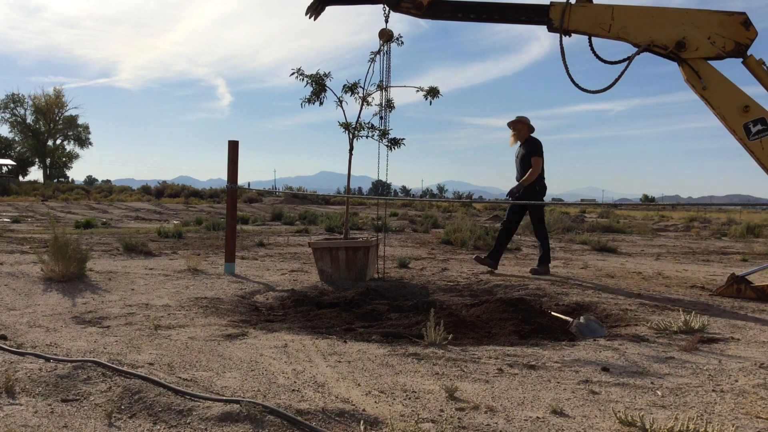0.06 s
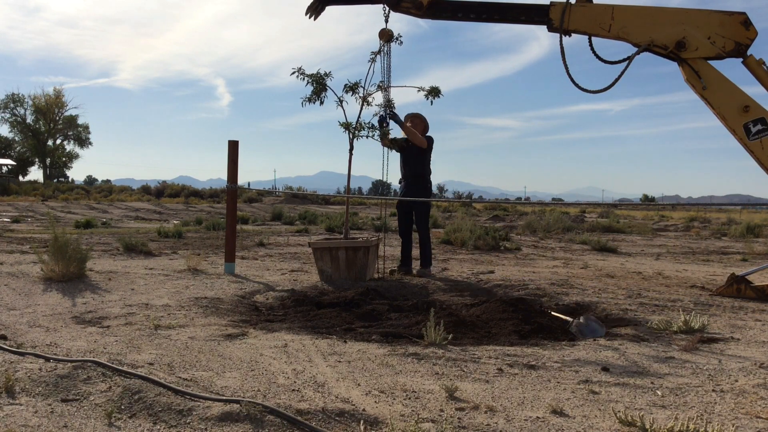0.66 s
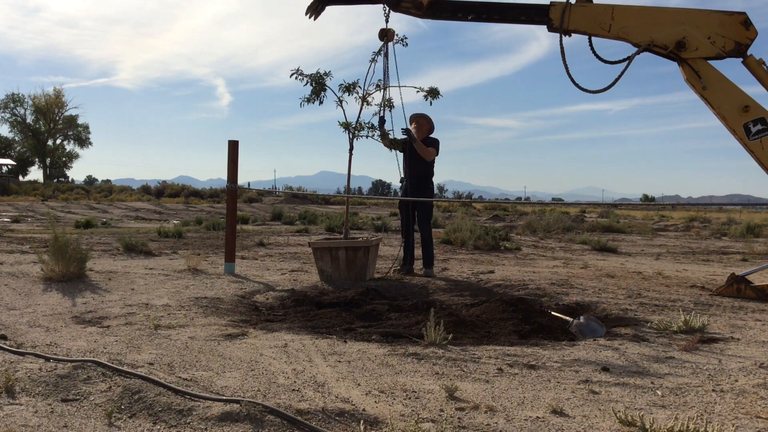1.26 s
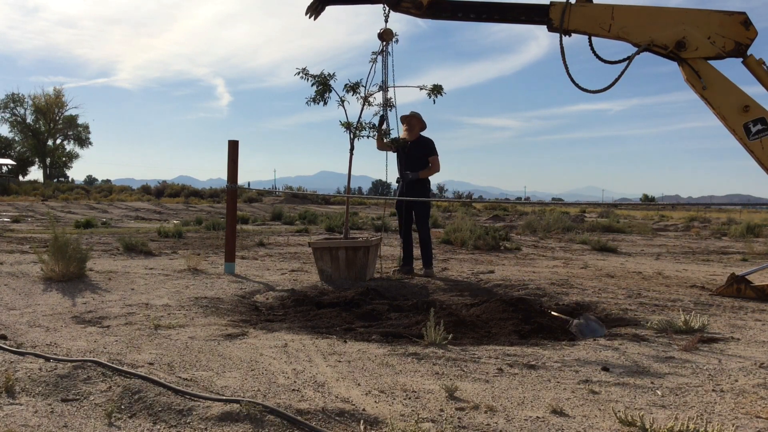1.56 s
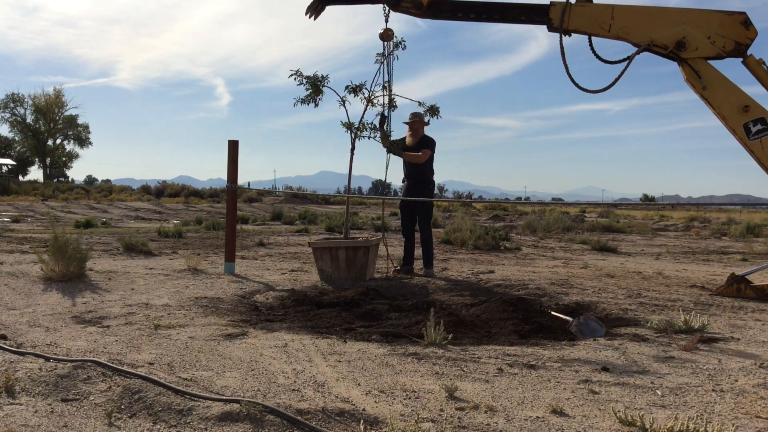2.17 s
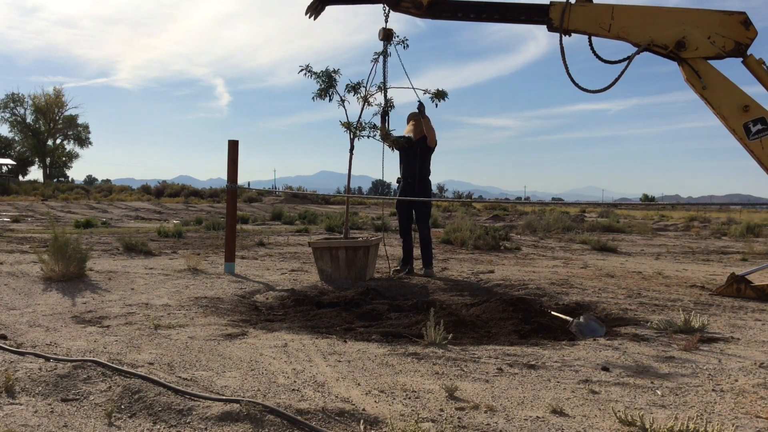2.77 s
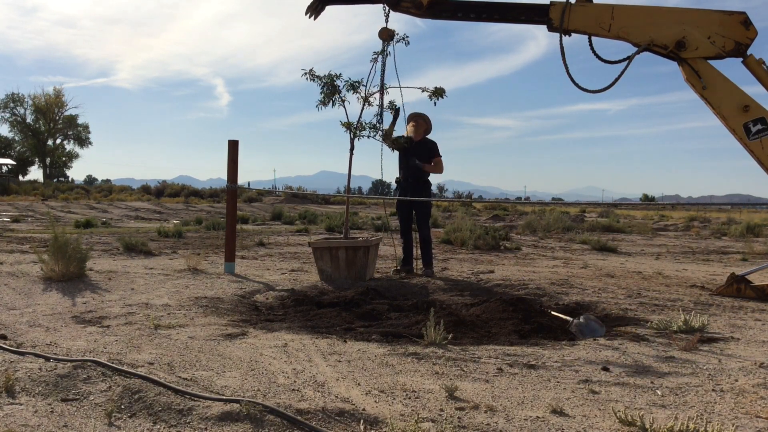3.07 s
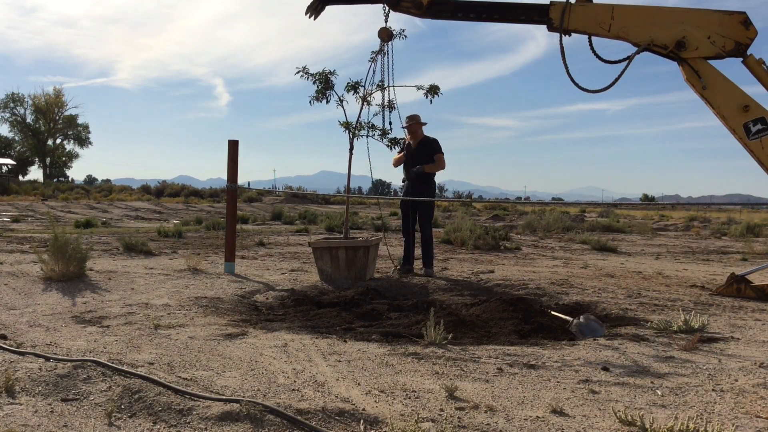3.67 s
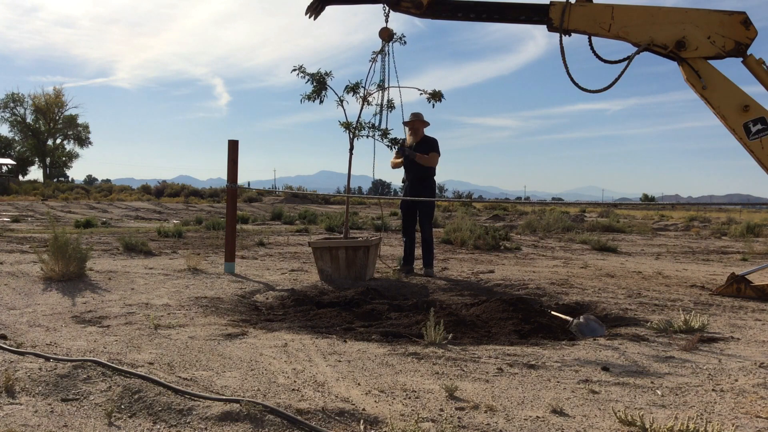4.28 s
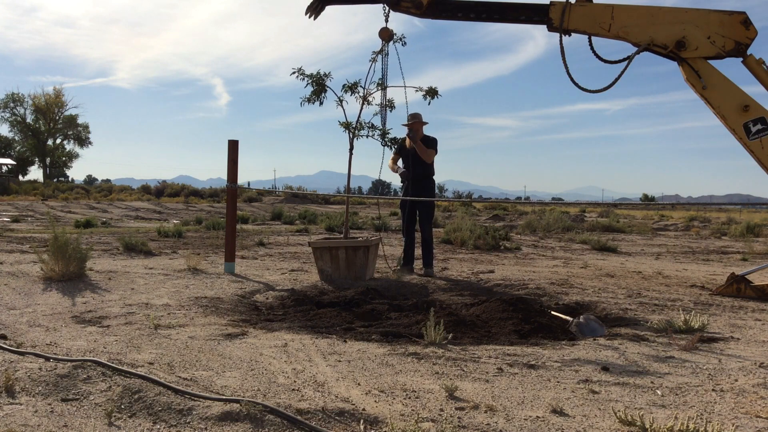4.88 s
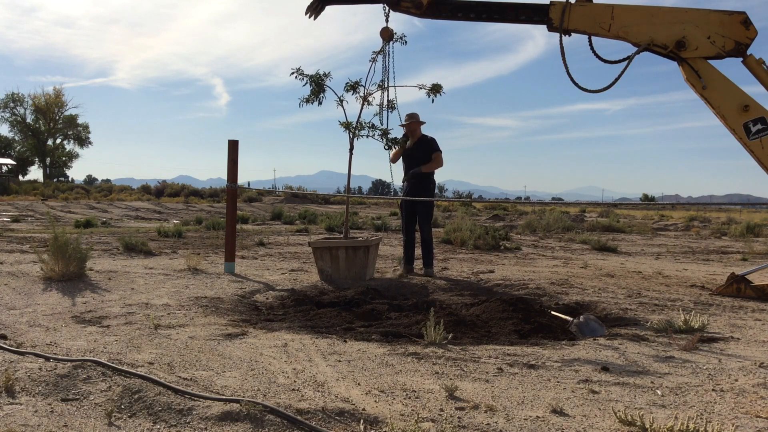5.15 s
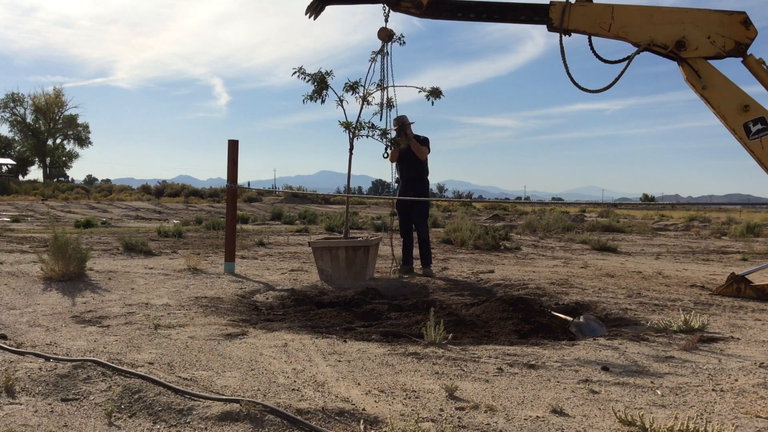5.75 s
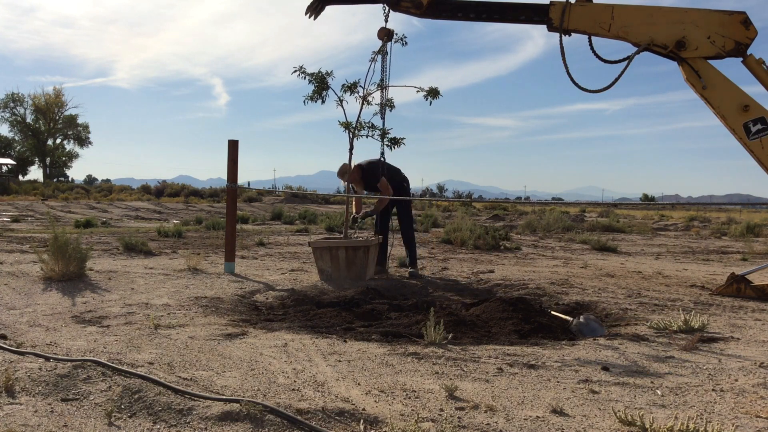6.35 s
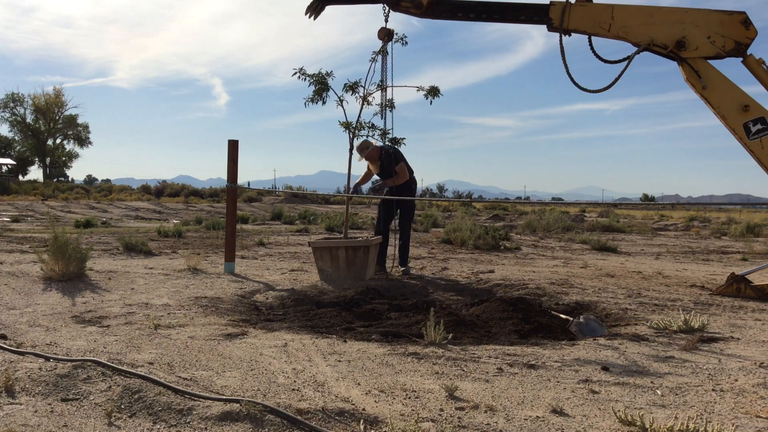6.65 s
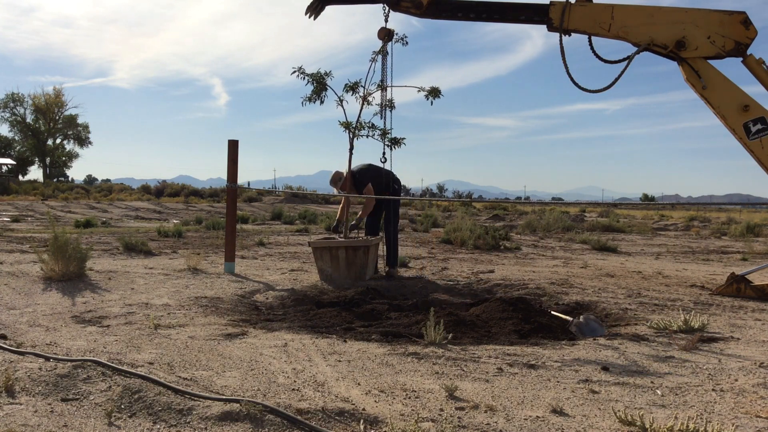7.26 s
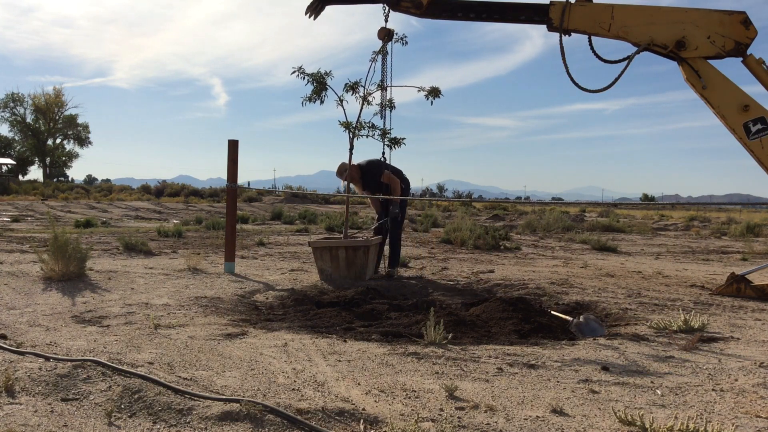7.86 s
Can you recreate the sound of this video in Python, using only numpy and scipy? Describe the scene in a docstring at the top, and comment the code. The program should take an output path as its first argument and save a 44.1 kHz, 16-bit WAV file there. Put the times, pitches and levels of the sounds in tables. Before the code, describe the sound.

Light wind blows over open desert, with two very soft footsteps on gritty soil in the first half second. From about 0.6 seconds, loose steel chain links tick and jingle some metres away. Between 1.2 and 2.5 seconds the chain is tugged through a hoist four times in short rattling bursts, the last two weaker. After a few more clinks, a long run starts at about 2.9 seconds: links and catch clack rapidly, making the steel housing ring, with faint dull knocks from the hook. The rattle grows faster and louder, stalls briefly near 5.8 seconds, surges again and runs out by 6.3 seconds with a tiny squeak and a few last ticks. A far vehicle's low road noise swells from around 5 seconds, with a faint wavering whine near the end, at about 8 seconds. A soft wind puff bumps the microphone at 7 seconds.

```python
"""A chain hoist rattles some metres away, hanging from an excavator boom in open desert.
Its hand chain is gathered up, tugged four times, then hauled in one fast run. The links and
the pawl (a small catch) clack against the wheel and make the steel housing ring.
Behind it are two soft footsteps, light wind and a far vehicle that slowly draws nearer."""
import sys
import numpy as np
from scipy import signal
from scipy.fft import rfft, irfft
from scipy.io import wavfile
from scipy.ndimage import uniform_filter1d, map_coordinates

SR = 44100
rng = np.random.default_rng(int(sys.argv[2]) if len(sys.argv) > 2 else 0)


def master(y):
    """Save y as 16-bit WAV."""
    cut = np.clip(np.atleast_2d(y).T, -1, 1)
    pcm = np.round(cut * 32767)  # scale
    wavfile.write(sys.argv[1], SR, pcm.astype(np.int16))


N = 349272
TIME = np.arange(N) / SR

# How each steel part rings when struck: f/Hz, width/Hz, level/dB
LINK_TONES = [(3210, 244, -0.5), (3564, 510, -10), (4310, 1400, -5), (4786, 140, -1), (5400, 730, -2),
              (6240, 440, -6), (6680, 1700, -8), (8200, 600, -5), (8950, 200, -4), (9600, 720, -12),
              (11200, 1500, -16), (12400, 750, -15.5), (13200, 780, -13.5), (15200, 1000, -28)]
HOUSING_TONES = [(1335, 226, -10.5), (1360.8, 330, -7.5), (1612, 228, -3.5), (1720, 130, -5.5),
                 (2167, 240, -10), (2345, 450, -11), (3190, 230, -10.5)]
TIGHT_WHEEL_TONES = [(610, 90, -15.5), (725, 170, -8.5), (877, 95, 0), (985, 140, -5.5), (1085, 70, -8.5)]
SLACK_WHEEL_TONES = [(695, 130, -8), (832, 140, -0.5), (913, 86, 3.5), (1034, 61, 4)]
# The chain pulls tight: t/s, tightness (0 to 1)
TIGHTNESS = [(2.6, 0), (3.2, 1)]

def hoist(clack_db=2, uneven_db=1.45, grain_db=3):
    """Each link clacks on the wheel; between clacks the chain scrapes through its guide."""
    level_db, rate, housing_share_db, link_share_db = hauling()
    times, blow_db, blow_share_db = clacks(level_db, rate, link_share_db)
    scrape_gain = scraping(level_db, rate, times)

    def force(blow_share, scrape_share, spread_s=.0028):
        """Blows plus scraping; every link hits each part a little differently."""
        db = blow_db + clack_db + 20 * np.log10(blow_share)
        db += uneven_db * rng.standard_normal(600)[:len(db)]
        blows = chatter(times, db, spread_s)
        scrape = unit(rng.standard_normal(N) * amp(grain_db * rng.standard_normal(N)))
        return blows + scrape_gain * scrape_share * scrape

    # the links take their share of the energy and jingle
    link_blow = np.clip(amp(blow_share_db), 0, .93)
    link_scrape = np.clip(amp(link_share_db), 0, .93)
    on_links = force(link_blow * amp(-1), link_scrape * amp(2.26), spread_s=.0038)
    links = amp(-1.87) * through(on_links, body(LINK_TONES)) + amp(-11) * link_ringing(on_links)
    # the frame (housing and wheel) takes the rest
    frame_blow, frame_scrape = np.sqrt(1 - link_blow ** 2), np.sqrt(1 - link_scrape ** 2)
    to_housing = np.clip(amp(housing_share_db) / frame_scrape, 0, .9)
    housing = through(to_housing * force(frame_blow, frame_scrape), body(HOUSING_TONES))
    on_wheel = np.sqrt(1 - to_housing ** 2) * force(frame_blow, frame_scrape)
    # the wheel rings lower once the chain is tight
    tight, = curves(TIGHTNESS)
    wheel = through(tight * on_wheel, body(TIGHT_WHEEL_TONES))
    wheel += amp(1) * through((1 - tight) * on_wheel, body(SLACK_WHEEL_TONES))
    return links + amp(.14) * housing + amp(.35) * wheel


# Tugs on the slack chain: start/s, end/s, rise/s, fall/s, level/dB, housing share/dB, link share/dB
CHAIN_TUGS = [(1.235, 1.63, 0.059, 0.067, -49.5, -11, -1), (1.741, 1.978, 0.11, 0.13, -44.5, -11, -2),
              (2.158, 2.33, 0.033, 0.048, -61.5, -6.5, -5), (2.374, 2.53, 0.034, 0.093, -54, -11.5, -1)]
TUG_LINKS_PER_S = 72
# The long run speeds up, stalls once and runs out: t/s, level/dB, speed/(links per s)
LONG_RUN = [(2.88, -71, 38), (2.915, -51, 36), (3.25, -46, 54), (3.75, -45, 78.7), (4.43, -44, 87.4),
            (4.75, -42.5, 109.4), (5.54, -43, 116.7), (5.66, -40, 115), (5.83, -49, 60), (5.97, -37.5, 105),
            (6.14, -48, 74), (6.3, -67, 43)]
# Brief surges in the run: t/s, extra level/dB
RUN_SURGES = [(5.115, 2.5), (5.29, 3), (5.635, 2.5)]
# How much of the run's rattle goes into the housing: t/s, share/dB
RUN_HOUSING_SHARE = [(2.95, -4), (3.3, -3.5), (5.6, -4.5), (6.1, -3)]

def hauling(turns_per_s=9.85, spin_up_per_s2=1.6, throb_db=1.5, surge_s=.025, run_link_db=-4.5):
    """The pull on the chain over time: its level, speed, housing share and link share."""
    tugs = sum(amp(db) * fade(start, end, rise, fall) for start, end, rise, fall, db, _, _ in CHAIN_TUGS)
    _, tug_housing_db, tug_link_db = curves([(s, *row[4:]) for row in CHAIN_TUGS for s in row[:2]])
    run_db, run_rate = curves(LONG_RUN)
    run_db += sum(db * np.exp(-((TIME - s) / surge_s) ** 2) for s, db in RUN_SURGES)
    run_housing_db, = curves(RUN_HOUSING_SHARE)
    # the rattle swells once per turn of the wheel, which slowly speeds up
    since = TIME - 4
    turns = turns_per_s * since + spin_up_per_s2 * since ** 2 / 2
    run_db += throb_db * np.cos(2 * np.pi * turns)
    running = (TIME > LONG_RUN[0][0]) & (TIME < LONG_RUN[-1][0])
    return (np.where(running, run_db, 20 * np.log10(tugs + 1e-7)),
            np.where(running, run_rate, TUG_LINKS_PER_S),
            np.where(running, run_housing_db, tug_housing_db),
            np.where(running, run_link_db, tug_link_db))


# The hardest clacks of links and pawl on the wheel: t/s, level/dB
HARD_CLACKS = [(1.27, -37.5), (1.526, -36), (1.638, -50), (1.766, -45.5), (1.793, -37), (1.814, -35.5),
               (1.829, -37), (1.853, -32), (1.869, -36), (1.932, -39), (1.959, -43.5), (2.214, -39.5),
               (2.252, -37.5), (2.392, -45), (2.423, -42.5), (2.438, -41), (2.454, -42.5), (2.641, -50),
               (2.908, -40), (2.971, -39), (3.138, -37), (3.356, -40), (3.398, -33), (3.446, -30.5),
               (3.579, -29), (3.697, -30.5), (3.819, -30), (3.946, -32), (3.995, -28.5), (4.005, -30),
               (4.033, -31.5), (4.112, -30), (4.401, -30), (4.5, -25), (4.657, -26.5), (4.683, -29.5),
               (4.743, -26.5), (5.094, -30), (5.377, -25), (5.67, -26.5), (5.696, -31), (5.803, -35),
               (5.853, -33)]

def clacks(level_db, rate, link_share_db, hard_db=-9, soft_db=1.28, dull_db=-2):
    """Times, levels and link shares of the clacks: one per link, plus hard ones that sound duller."""
    s, db = np.transpose(HARD_CLACKS)
    hard = np.c_[s + .002, db + hard_db, np.interp(s, TIME, link_share_db) + dull_db]
    links_passed = np.cumsum(rate * amp(.5 * wander(60))) / SR
    beat = np.flatnonzero(np.diff(np.floor(links_passed)))
    # skip a link if a hard clack is close by or the chain is at rest
    links_from_hard = np.abs(TIME[beat, None] - s).min(axis=1) * rate[beat]
    beat = beat[(links_from_hard > .85) & (level_db[beat] > -100)]
    beat_db = level_db[beat] + soft_db + 20 * np.log10(catching()[beat])
    beat_db += rng.standard_normal(600)[:len(beat)]
    beat_db += np.log2(TUG_LINKS_PER_S / rate[beat])  # 1 dB louder at half the speed
    soft = np.c_[TIME[beat], beat_db, link_share_db[beat]]
    return np.r_[hard, soft].T


def catching(dip_db=-5, lead_s=.01, width_s=.0042):
    """The chain catches just before each hard clack, so its rattle dips."""
    dips = sum(np.exp(-np.minimum(((TIME - s + lead_s) / width_s) ** 2, 20)) for s, _ in HARD_CLACKS)
    return amp(dip_db * dips)


def scraping(level_db, rate, clack_times, crowding=.23, half_speed_db=-2.5):
    """How strongly the chain scrapes: the faster it runs, the more its touches blur into a rush."""
    marks = np.r_[np.sort(clack_times), 2 * N / SR]
    until_clack = marks[np.searchsorted(marks, TIME)] - TIME
    contact = 1 - .4 * np.exp(-(until_clack / .004 - 1) ** 2)  # it hangs free just before it strikes
    db = level_db - 2 + crowding * np.clip(level_db + 42, -15, 8)
    db += half_speed_db * np.log2(TUG_LINKS_PER_S / rate)
    return amp(db) * contact * catching()


# A single link's ring, soon stopped by its neighbours: f/Hz, level/dB, fade time/s
SINGLE_LINK_TONES = [(3220, -3, .025), (4675, 0, .035), (4970, -6, .03), (5350, -4, .025), (5660, -5, .025),
                     (6133, -1, .04), (6590, -6, .03), (8150, -5, .025)]

def link_ringing(force, detune=.009):
    """No two links are alike, so the pitch of their ring keeps shifting a little."""
    clock = np.arange(N) + np.cumsum(detune * wander(40))
    clock -= uniform_filter1d(clock - np.arange(N), SR // 8)  # stay in time with the blows
    t = TIME[:SR // 4]
    ring = sum(amp(db - 60 * t / t60) * np.sin(2 * np.pi * hz * t) for hz, db, t60 in SINGLE_LINK_TONES)
    return map_coordinates(through(force, ring), [clock], order=3)


# Slack links touching each other: t/s, level/dB, treble share/dB, f/Hz
LINK_TICKS = [(0.602, -70.5, -7, 6230), (0.689, -62.5, -28, 3210), (0.712, -67, 0, 8920),
              (0.7312, -60, -10, 8590), (0.766, -64, -1, 6400), (0.7868, -53, -26, 4830),
              (0.8736, -58.5, -3, 9010), (0.9022, -63, -5, 9200), (0.9286, -62, -7, 8330),
              (0.9958, -55, -27, 4760), (1.045, -62.5, -23, 3940), (1.07, -62, -6, 6200),
              (1.0863, -57, -15, 4500), (1.1055, -56.5, -0.5, 8000), (1.162, -58, -32, 3270),
              (2.0083, -73, -12, 6860), (2.0333, -72, -9, 8400), (2.354, -65, -14, 4760),
              (2.5453, -62, -7, 8950), (2.7726, -61.5, -9, 4000), (2.792, -56.5, -5, 5280),
              (2.809, -48, -1, 4600), (2.83, -57, -11, 3230), (2.863, -64, 0, 8260),
              (6.333, -62, -30, 5930), (6.4214, -75.5, -1, 2710), (6.5774, -74, -6.5, 2570)]

def slack_chain(ring_s=.045):
    """Loose links tick at their own pitches: light touches are bright, heavy ones reach the hoist."""
    s, db, treble_db, ring_hz = np.transpose(LINK_TICKS)
    treble = np.clip(amp(treble_db), 0, .95)
    heavy_db = db + 10 * np.log10(1 - treble ** 2)
    heavy = chatter(s + .004, heavy_db, .004, count=6)
    light = chatter(s + .005, db + treble_db, .006, count=14)
    t = TIME[:SR // 10]
    rings = np.zeros(N)
    for start, level_db, hz in zip((s * SR).astype(int), heavy_db, ring_hz):
        rings[start:start + len(t)] += amp(level_db - 60 * t / ring_s) * np.sin(2 * np.pi * hz * t)
    ticks = through(heavy, body([(4170, 4700, 0)]))
    knocks = through(heavy, body(SLACK_WHEEL_TONES + [(1530, 390, -.55)]))
    sparkle = through(light, body([(8200, 5200, -11), (12900, 3100, -18)]))
    return amp(-13) * ticks + amp(-11) * rings + amp(-8) * knocks + amp(-6) * sparkle


# When the loose chain jingles faintly: start/s, end/s
JINGLE_SPANS = [(.7, 1.25), (2.0, 2.88)]

def loose_jingle(touches_per_s=56, level_db=-84.5, uneven_db=4.5):
    """Hanging links brush together at random, too softly to reach the hoist."""
    gaps = -np.log(1 - rng.random(600)) / touches_per_s
    s = np.cumsum(gaps)
    db = level_db + uneven_db * rng.standard_normal(600)
    moving = np.any([(s > start) & (s < end) for start, end in JINGLE_SPANS], axis=0)
    touches = chatter(s[moving], db[moving], .0036, count=8)
    return through(touches, body([(5630, 5700, -1.8), (8400, 2500, .24), (12500, 3300, -3.1)]))


# Tiny squeaks: t/s, f/Hz, level/dB, rise/s
STEEL_SQUEAKS = [(0.869, 14200, -68, .005), (6.123, 14870, -49, .006)]

def squeaks():
    """A link slips on steel with a very short, high whistle."""
    return sum(amp(db) * swell(s, rise) * tone(hz + 60 * wander(300))
               for s, hz, db, rise in STEEL_SQUEAKS)


# Knocks on the hook: t/s, level/dB
HOOK_KNOCKS = [(1.448, -52.5), (1.476, -50.5), (3.842, -49.5), (4.308, -51), (4.342, -53), (4.997, -50.5)]

def hook_knocks():
    """The swinging hoist knocks dully on its hook."""
    s, db = np.transpose(HOOK_KNOCKS)
    hook = body([(190, 150, -5), (290, 220, 0), (400, 200, -4)])
    return through(chatter(s + .0052, db - 7, .0118), hook)


def echoes(sound, level_db=-13, fade_s=.027):
    """The excavator and the rough ground throw back a brief, faint echo."""
    t = TIME[:SR // 4]
    tail = rng.standard_normal(len(t)) * amp(-60 * t / fade_s) * (t > .003)
    return sound + amp(level_db) * through(sound, tail)


# Footsteps: t/s, level/dB
FOOTSTEPS = [(.17, -81), (.405, -73.5)]

def footsteps():
    """Shoes crunch briefly on gritty soil."""
    grit = noise([(200, -18), (700, 2), (2500, -6), (8000, -26), (15000, -26)]) * amp(3 * wander(440))
    return grit * sum(amp(db) * swell(s, .0075) for s, db in FOOTSTEPS)


# Puffs of wind: t/s, level/dB, rise/s
WIND_PUFFS = [(.95, -58, 0.014), (2.93, -61.5, 0.057), (3.93, -66, 0.034), (7.049, -55.5, 0.035)]

def gusts():
    """Puffs of wind hit the microphone with a low thud."""
    rumble = noise([(15, 3.5), (50, -6.5), (110, -8.5), (250, -39), (1000, -48), (15000, -90)])
    return rumble * sum(amp(db) * swell(s, rise) for s, db, rise in WIND_PUFFS)


# The sound of open air, from low to high: f/Hz, level/dB
AIR_COLOUR = [(20, 4.5), (45, 1.5), (100, -1.5), (190, -4.5), (300, -23.5), (400, -36), (680, -21.5),
              (880, -19.5), (1250, -28), (2200, -33.5), (4000, -40), (15000, -43)]

def wind(level_db=-68, uneven_db=4):
    """Light wind: a steady hiss over an uneven rumble."""
    air = noise(AIR_COLOUR)
    rumble = lowpass(air, 120)
    return amp(level_db) * (air + rumble * (amp(uneven_db * wander(16)) - 1))


# Road noise, from low to high: f/Hz, level/dB
ROAD_COLOUR = [(30, -16.5), (70, -1.5), (110, -2), (240, -5.5), (330, -7), (600, -14), (900, -18.5),
               (1400, -26), (2400, -29.5), (4200, -44.5), (7000, -63), (15000, -76)]
# The vehicle's approach: t/s, level/dB, extra treble/dB
VEHICLE_APPROACH = [(0, -76.5, -14), (1.5, -77.5, -1.5), (3.1, -81.5, 9), (5.2, -65, -7), (6.3, -61, -3.5),
                    (7.05, -62, -1.5), (7.65, -59.5, 1), (7.92, -70, 9.5)]

def far_vehicle():
    """Road noise grows louder and brighter as the vehicle draws nearer."""
    level_db, treble_db = curves(VEHICLE_APPROACH)
    road = noise(ROAD_COLOUR) * amp(.6 * wander(9))
    low = lowpass(road, 500)
    return amp(level_db) * (low + amp(treble_db) * (road - low))


# When the vehicle whines: start/s, end/s, level/dB, f/Hz
VEHICLE_WHINES = [(-.2, 1.164, -90.5, 484), (1.123, 2.195, -85, 489), (6.5, 7.1, -74.5, 463),
                  (7.2, 7.79, -70, 454)]

def vehicle_whine(waver_db=3, waver_hz=6, fade_s=.063):
    """The far vehicle's wavering whine fades in and out."""
    drift = waver_hz * wander(50)
    tones = sum(amp(db) * fade(start, end, fade_s, fade_s) * tone(hz + drift)
                for start, end, db, hz in VEHICLE_WHINES)
    return np.sqrt(2) * tones * amp(waver_db * wander(25))


def chatter(times, db, spread_s, count=48):
    """Turn each blow into a dense cluster of tiny taps spread over a few milliseconds."""
    draws = rng.random((600, 3, count))[:len(times)]
    delay = spread_s * (draws[:, 0] + draws[:, 1] - 1)
    push = 2 * draws[:, 2] - 1
    push *= (amp(db) * np.sqrt(spread_s * SR / np.sum(push ** 2, axis=1)))[:, None]
    where = np.clip((times[:, None] + delay) * SR, 0, N - 1).astype(int)
    return np.bincount(where.ravel(), push.ravel(), N)


def body(tones, size=4096):
    """How an object with these tones rings after one sharp tap."""
    f = np.arange(size // 2 + 1) * SR / size
    power = sum(amp(db) ** 2 / (1 + (2 * (f - hz) / width) ** 2) ** 2 for hz, width, db in tones)
    # this fold makes the ring come after the tap, never before it
    cepstrum = irfft(np.log(power) / 2)
    cepstrum[1:size // 2] *= 2
    cepstrum[size // 2 + 1:] = 0
    return irfft(np.exp(rfft(cepstrum)))


def through(x, ring):
    """Let every sample of x set off the ring, scaled to energy 1."""
    return signal.fftconvolve(x, ring / np.linalg.norm(ring))[:N]


def noise(colour):
    """Noise of strength 1, shaped by (f/Hz, level/dB) points."""
    hz, db = np.transpose(colour)
    f = np.arange(N // 2 + 1) * SR / N
    gain = amp(np.interp(np.log(f + 1), np.log(hz), db))
    return unit(irfft(rfft(rng.standard_normal(N)) * gain, N))


def tone(hz):
    """A pure tone that follows a changing pitch."""
    return np.sin(2 * np.pi * np.cumsum(hz) / SR)


def lowpass(x, hz):
    """Gently soften everything above hz."""
    return signal.sosfilt(signal.butter(1, hz, fs=SR, output="sos"), x)


def swell(start, rise):
    """Climb to 1 in the rise time, then die away."""
    u = np.clip((TIME - start) / rise, 0, 50)
    return u * np.exp(1 - u)


def fade(start, end, rise, fall):
    """Fade in, hold, fade out."""
    return np.clip(np.minimum((TIME - start) / rise, (end - TIME) / fall), 0, 1)


def wander(rate):
    """A random drift of about 1 either way, turning rate times a second."""
    hold = int(SR / rate)
    steps = rng.standard_normal(4000)[np.arange(N) // hold]
    return 1.2 * uniform_filter1d(steps, hold)


def curves(table):
    """Join a table's points into one curve in time per value column."""
    s, *columns = np.transpose(table)
    return [np.interp(TIME, s, c) for c in columns]


def amp(db):
    """Decibels to gain."""
    return 10 ** (np.asarray(db) / 20)


def unit(x):
    """Scale to an average strength (rms) of 1."""
    return x / np.sqrt(np.mean(x ** 2))


def scene():
    """The hoist and its small noises in the open air, in one channel."""
    steel = hoist() + slack_chain() + loose_jingle() + squeaks() + hook_knocks()
    return (echoes(steel) + footsteps() + gusts() + wind() + far_vehicle() + vehicle_whine())[None]


def record(dry, top_hz=15700):
    """Cut off the very highest treble."""
    return signal.sosfilt(signal.ellip(10, .2, 80, top_hz, fs=SR, output="sos"), dry)


dry = scene()
out = record(dry)
master(out)
```